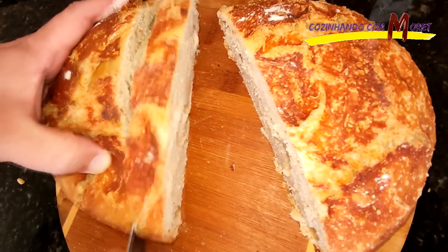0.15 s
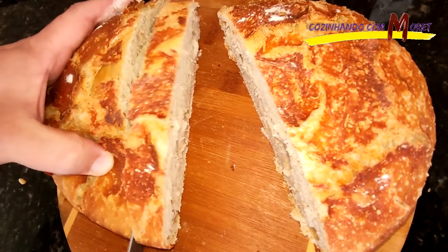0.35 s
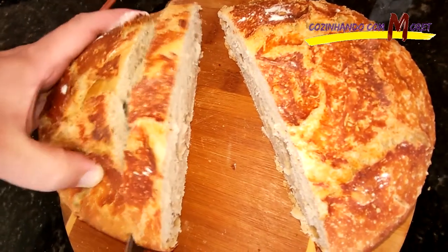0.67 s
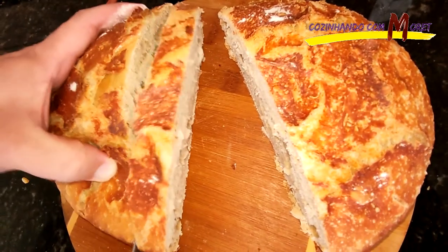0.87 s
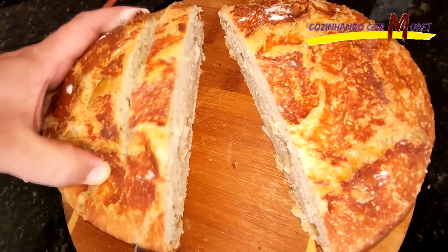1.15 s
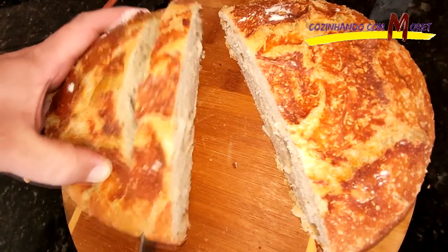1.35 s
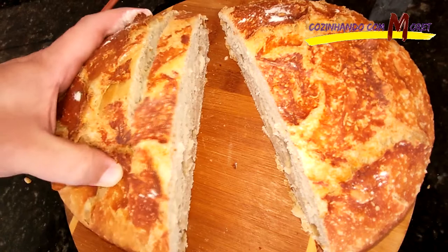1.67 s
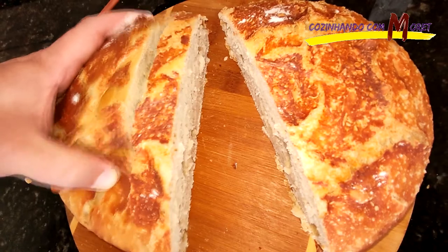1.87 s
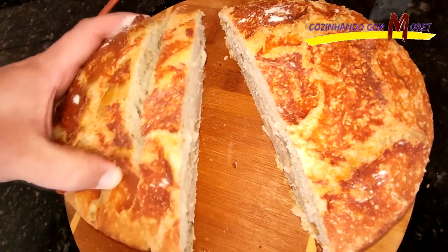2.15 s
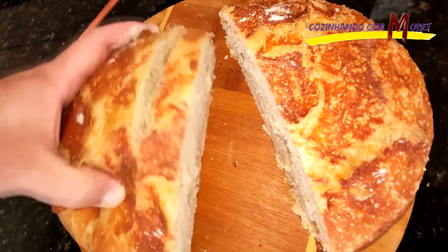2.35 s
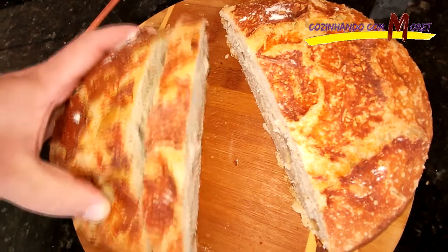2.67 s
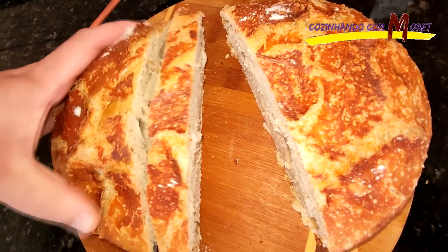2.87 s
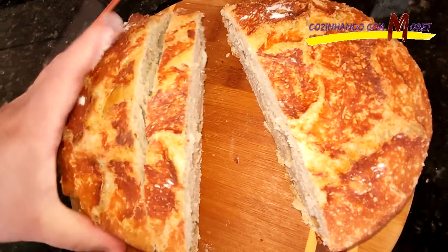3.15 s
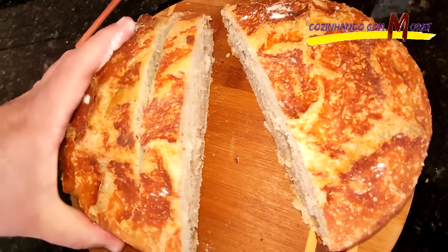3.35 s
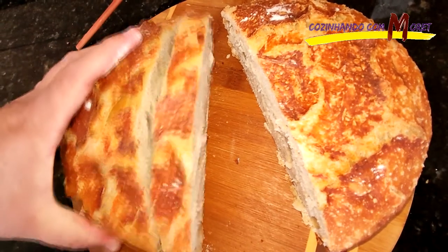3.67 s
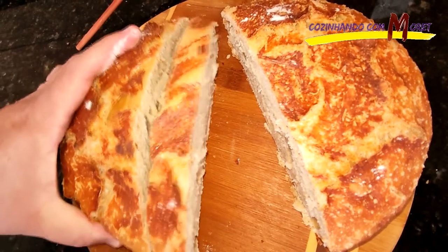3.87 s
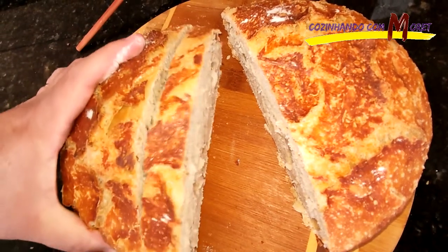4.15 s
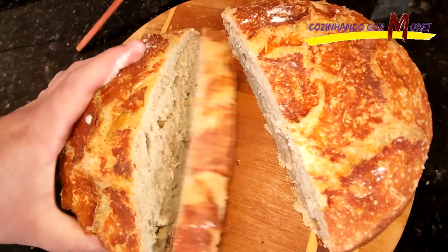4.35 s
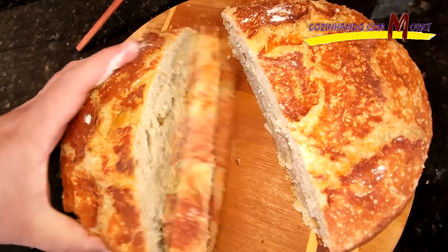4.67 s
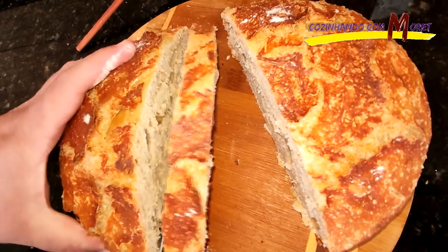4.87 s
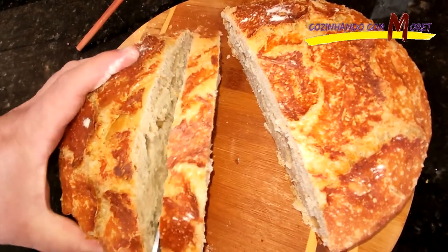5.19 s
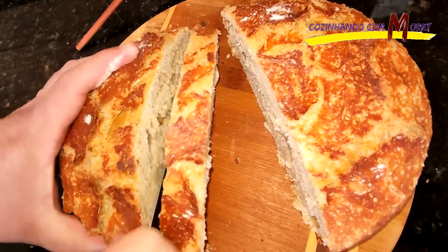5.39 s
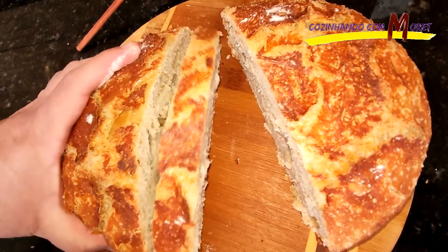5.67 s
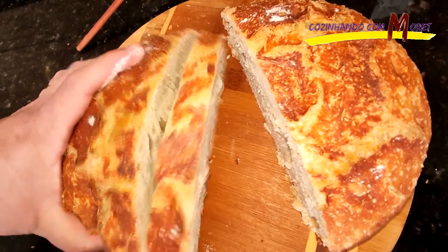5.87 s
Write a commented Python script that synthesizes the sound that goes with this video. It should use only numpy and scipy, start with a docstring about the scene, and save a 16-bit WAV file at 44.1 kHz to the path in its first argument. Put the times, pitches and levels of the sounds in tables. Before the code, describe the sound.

A knife saws through a crusty loaf on a wooden board, close up in a quiet kitchen with a faint low room rumble. From the start it moves back and forth about three times a second, each stroke a grainy rasp of crust over a softer drag through the crumb. Flakes snap off in crisp showers, thickest around 0.7 to 1 second and near 1.6 seconds. As the blade catches, the loaf gives hollow knocks and the board thrums, most clearly near 0.7 and 2 seconds. The sawing eases from about 2.5 seconds, then bites again with bright crackling at 3.2 seconds and a sharp snap near 3.9. From 4 to 5.4 seconds the strokes are shorter and much quieter, with scattered ticks of crust. Firmer strokes and crackles return from 5.5 seconds to the end at about 6 seconds.

```python
"""A knife saws through a crusty loaf on a wooden board, close up in a quiet kitchen.
The blade rasps the crust in fine grains, and flakes snap off in showers of crackle. Underneath,
it drags through the crumb, and its stick-slip jolts make the loaf shudder and the board thrum.
Two microphone ports, each with its own treble resonances, hear it, the left with a small lag."""
import sys
import numpy as np
from scipy import signal
from scipy.fft import rfft, irfft
from scipy.io import wavfile
from scipy.ndimage import uniform_filter1d

SR = 44100
rng = np.random.default_rng(int(sys.argv[2]) if len(sys.argv) > 2 else 0)


def dump(signal):
    """Clip the signal to [-1, 1] and save it as 16-bit WAV at the path in sys.argv[1]."""
    limited = np.clip(np.atleast_2d(signal).T, -1, 1)
    pcm = np.round(limited * 32767).astype(np.int16)
    wavfile.write(sys.argv[1], SR, pcm)


N = 265462
CONTROL_T = np.arange(0, N / SR + .002, .001)  # envelope clock in s, one step per millisecond


def undb(db):
    return 10 ** (np.asarray(db) / 20)


def unit(x):
    """Scale to rms 1."""
    return x / np.sqrt(np.mean(x ** 2))


def pan(db):
    """Left and right gains; positive dB leans left."""
    return undb(np.array([db, -db]) / 2)


def every_sample(envelope, late_s=0.):
    """Bring an envelope up to audio rate, with an optional delay."""
    return np.interp(np.arange(N) / SR - late_s, CONTROL_T, envelope)


def walk(rate):
    """Random modulator: glides to a new value rate times a second, rms 1."""
    hold = int(SR / rate)
    steps = np.repeat(rng.standard_normal(N // hold + 1), hold)
    return unit(uniform_filter1d(steps, hold)[:N])


def grains(rate, spread_db):
    """Random clicks, rate per second; a few stick far out."""
    hit = rng.random(N) < rate / SR
    return hit * rng.standard_normal(N) * undb(spread_db * rng.exponential(size=N))


def ring(x, modes):
    """A bank of two-pole resonators in alternating polarity."""
    return sum((-1) ** k * undb(db) * signal.lfilter(*signal.iirpeak(hz, hz / width, SR), x)
               for k, (hz, width, db) in enumerate(modes))


def glide(x, hz, width):
    """Swept resonator: shift its centre down to zero, smooth, shift back."""
    turn = np.exp(2j * np.pi * np.cumsum(hz) / SR)
    pole = np.exp(-np.pi * width / SR)
    return 2 * np.real(turn * signal.lfilter([1 - pole], [1, -pole], x / turn))


# Room tone spectrum: f/Hz, level/dB
ROOM_TONE = [(15, 7.5), (25, 9.5), (117, -1.5), (222, -20.5), (290, -12), (563, -17), (1160, -23.5),
             (3730, -40), (4380, -60), (7260, -43), (9220, -28), (12700, -36), (14500, -52)]
def kitchen():
    """A bed of rumble and hush, narrow in the bass and wide in the treble."""
    hz = np.arange(N // 2 + 1) * SR / N + 1
    point_hz, point_db = np.array(ROOM_TONE).T
    colour = undb(np.interp(np.log(hz), np.log(point_hz), point_db))
    mid, side = rfft(rng.standard_normal((2, N)), axis=1) * colour
    side *= np.clip(hz / 900, .18, 1)
    return undb(-47) * unit(irfft(np.array([mid + side, mid - side]), N, axis=1))


def nearby(x, t60_s, wet_db, near_s, near_db, left_lag_s=.0004):
    """One spot's sound: direct path, quick scatter off loaf and board (near), kitchen tail (wet)."""
    t = np.arange(SR // 3) / SR
    fade = undb(near_db - 60 * t / near_s) + undb(wet_db - 60 * t / t60_s)
    response = rng.standard_normal((2, len(t))) * fade
    response[0, int(left_lag_s * SR)] += 1
    response[1, 0] += 1
    response /= np.linalg.norm(response, axis=1, keepdims=True)
    return signal.fftconvolve(x, response, axes=1)[:, :N]


def along_cut(x, spots=4, hops_per_s=150, **room):
    """The contact hops between spots along the cut, each with its own echoes."""
    hold = SR // hops_per_s
    spot = np.repeat(rng.integers(0, spots, N // hold + 1), hold)[:N]
    return sum(nearby(x * (spot == k), **room) for k in range(spots))


# Treble peaks of each microphone port: f/Hz, width/Hz, level/dB
LEFT_PEAKS = [(5300, 500, -9.5), (8650, 2000, -7.5), (8400, 600, -18), (11280, 1460, 1), (12700, 860, -20)]
RIGHT_PEAKS = [(6580, 1600, -6), (7640, 1140, -3), (9180, 1530, 11.5), (9337, 2240, 8), (12660, 780, -6)]
def port_sheen(x):
    """Each port rings and puts its own sheen on the top end."""
    return np.array([ring(x[0], LEFT_PEAKS), ring(x[1], RIGHT_PEAKS)])


# Knife strokes: t/s, rise/s, hold/s, fall/s, rasp level/dB, drag level/dB, loaf level/dB, board level/dB
KNIFE_STROKES = [(0., 0.0016, 0.033, 0.074, -28, -18.5, -31, -61),
                 (0.138, .06, 0.25, 0.1, -33.5, -22, -21, -48),
                 (0.574, 0.011, .14, 0.12, -32, -22.5, -36, -51),
                 (0.818, 0.064, 0.094, 0.16, -26, -19, -18, -47),
                 (1.148, 0.066, 0.12, 0.13, -32.5, -22, -35, -52),
                 (1.459, 0.081, 0.049, 0.17, -27, -20.5, -20.5, -46),
                 (1.748, 0.06, 0.028, 0.084, -34, -20.5, -25, -43),
                 (1.913, .13, 0.035, 0.12, -27.5, -18.5, -13.5, -37),
                 (2.222, 0.12, 0.032, 0.09, -24.5, -16, -38, -56),
                 (2.493, 0.044, .22, 0.09, -37.5, -22.5, -21, -57),
                 (2.85, 0.11, 0.046, 0.12, -37.5, -32, -28.5, -58),
                 (3.189, 0.053, 0.083, 0.15, -31, -20.5, -21, -53),
                 (3.494, 0.09, 0.11, 0.055, -40, -27, -16.5, -43),
                 (3.771, 0.045, 0.053, 0.098, -26.5, -19.5, -17.5, -45.5),
                 (3.978, 0.1, 0.056, .06, -38.5, -28.5, -26.5, -55),
                 (4.2, 0.043, .01, 0.066, -43, -32.5, -28.5, -54),
                 (4.318, .05, 0.063, 0.083, -37, -35.5, -43, -74),
                 (4.619, 0.046, 0.044, 0.073, -40.5, -33.5, -29.5, -70),
                 (5.04, 0.1, 0.027, 0.062, -50, -34, -29, -66),
                 (5.179, 0.043, 0.061, 0.096, -37.5, -38, -53, -71),
                 (5.39, 0.066, .06, 0.036, -36.5, -38, -32.5, -64),
                 (5.498, 0.044, .09, .07, -33, -26, -26, -53),
                 (5.72, 0.077, 0.038, 0.062, -40.5, -28, -41, -49),
                 (5.862, 0.068, 0.036, 0.056, -31, -21.5, -17, -46)]
def blade_speeds():
    """One speed curve, 0..1, per stroke: the blade speeds up, holds, slows down."""
    corners = np.cumsum(np.array(KNIFE_STROKES)[:, :4], axis=1)
    ramps = np.array([np.interp(CONTROL_T, times, [0, 1, 1, 0]) for times in corners])
    return np.sin(np.pi / 2 * ramps)


def sawing(layer, law, rest_db, linger_db, linger_ms=120):
    """A layer's envelope: grows as speed ** law, smears a little, keeps a floor as the blade turns."""
    column = {"rasp": 4, "drag": 5, "loaf": 6, "board": 7}[layer]
    power = undb(2 * np.array(KNIFE_STROKES)[:, column]) @ blade_speeds() ** (2 * law)
    linger = np.abs(uniform_filter1d(power, size=linger_ms))
    return np.sqrt(power + undb(2 * linger_db) * linger + undb(2 * rest_db))


# Low-end accents: t/s, half-width/s, loaf level/dB, board delay/s, board level/dB, hollow level/dB
BITES = [(.01, 0.1, -12.5, 0.04, -50, -16.5), (0.413, 0.028, -43, 0.026, -38, -30),
         (0.672, 0.077, -4.5, 0.026, -38.5, -10), (0.964, 0.032, -19, 0.0046, -42.5, -16.5),
         (1.306, 0.086, -11, 0.022, -37, -16.5), (1.563, 0.042, -13, .005, -60, -26),
         (1.814, 0.071, -28, 0.0092, -45.5, -19), (2.042, 0.041, -7, 0.044, -40, -5),
         (2.338, 0.047, -8.5, 0.025, -46.5, -16.5), (3.002, 0.052, -47, 0.073, -46.5, -26.5),
         (3.351, 0.052, -27, .005, -39.5, -15), (3.595, 0.067, -40, 0.0039, -37.5, -25.5),
         (3.879, 0.02, -20, 0.0042, -39.5, -14), (5.612, 0.028, -16.5, 0.0055, -52, -41),
         (5.845, 0.045, -15.5, 0.032, -43.5, -23)]
def judders():
    """The blade bites and shoves the loaf: bell-shaped swells for loaf, board and hollow knock."""
    at, half_width, loaf_db, delay, board_db, hollow_db = np.array(BITES).T[:, :, None]

    def swell(centre, db):
        bells = undb(db) * np.exp(-((CONTROL_T - centre) / half_width) ** 2)
        return every_sample(np.linalg.norm(bells, axis=0))
    return swell(at, loaf_db), swell(at + delay, board_db), swell(at, hollow_db)


# The board's woody low end: f/Hz, width/Hz, level/dB
BOARD_MODES = [(91.3, 16, 3.5), (147.6, 24.2, 4.5), (188.5, 15.5, -1.5), (227.2, 19.7, -5.5)]
def board_thrum(swell):
    """The board answers each stroke a little late; its long waves reach both ports almost alike."""
    strokes = every_sample(sawing("board", law=1.43, rest_db=-56, linger_db=-15), late_s=.035)
    mid = unit(ring(grains(1500, 2.9), BOARD_MODES))
    side = unit(ring(rng.standard_normal(N), BOARD_MODES)) * undb(-16)
    return np.array([mid + side, mid - side]) * np.hypot(strokes, swell)


# The loaf's hollow notes: f/Hz, width/Hz, level/dB, pan/dB
HOLLOW_MODES = [(320, 19, -23, -26), (442, 24, -9.5, 1), (500.7, 31, -7.5, -8.5), (582.4, 32, -6, 0.5),
                (946, 46, -13.5, 3.5)]
def hollow_knock(jolts):
    """Jolts ring the loaf's deep modes, dry, each leaning its own way."""
    return sum((-1) ** k * ring(jolts, [(hz, width, db)]) * pan(pan_db)[:, None]
               for k, (hz, width, db, pan_db) in enumerate(HOLLOW_MODES))


# The loaf's midrange body: f/Hz, width/Hz, level/dB
LOAF_MODES = [(294.5, 68, -15), (641, 62, -14), (790, 175, -14), (1028, 97, -7), (1094, 340, -12.5)]
def loaf_shudder(body_swell, hollow_swell):
    """The blade sticks and slips, and the jolts shake the whole loaf."""
    slips = unit(grains(3000, .66) * undb(2.46 * walk(40)))
    push = every_sample(sawing("loaf", law=1.64, rest_db=-38, linger_db=-15))
    knock = hollow_knock(slips * np.hypot(push * undb(-5.5), hollow_swell))
    body = slips * np.hypot(push, body_swell) * pan(-1.3)[:, None]
    body = along_cut(body, t60_s=.28, wet_db=-30, near_s=.027, near_db=-25, left_lag_s=.00042)
    return ring(body, LOAF_MODES) + knock


# The crumb's steady colour: f/Hz, width/Hz, level/dB
CRUMB_MODES = [(2180, 1070, -14), (3540, 220, -25), (5400, 2200, -20)]
# Sweep of the slot's resonance: t/s, f/Hz
SLOT_SWEEP = [(0.0, 3930), (0.47, 3220), (0.5, 3920), (0.67, 3500), (1.09, 3720), (1.29, 3260),
              (1.68, 3740), (1.69, 3400), (2.2, 3500), (2.21, 3790), (2.48, 3260), (3.24, 3830),
              (3.64, 3270), (3.89, 3940), (4.29, 3470), (4.32, 4860), (4.46, 5100), (4.49, 3430),
              (4.59, 3530), (4.63, 4900), (4.68, 3370), (5.2, 3300), (5.28, 4060), (6.02, 3520)]
def crumb_drag(catch):
    """The blade drags through the crumb; a resonance moves as the slot opens and closes."""
    strokes = every_sample(sawing("drag", law=1.24, rest_db=-40, linger_db=-10.5))
    drag = unit(grains(5000, 1.56) * undb(2.2 * catch)) * strokes
    drag = along_cut(drag[None], t60_s=.12, wet_db=-20, near_s=.0034, near_db=-17)
    slot_hz = np.interp(np.arange(N) / SR, *np.array(SLOT_SWEEP).T)
    slot_hz *= np.exp(.057 * walk(25))
    return ring(drag, CRUMB_MODES) - undb(-11) * glide(drag, slot_hz, width=630)


def small_snaps(rasp_envelope, count=18, over_db=10.5):
    """Random filler snaps that ride above the rasp, more often where the blade is fast."""
    speed = blade_speeds().sum(axis=0)
    at = np.interp(rng.random(count), np.cumsum(speed) / np.sum(speed), CONTROL_T)
    size, bright, side = rng.standard_normal((3, count))
    db = 20 * np.log10(np.interp(at, CONTROL_T, rasp_envelope)) + over_db + 3 * size
    thick_db = np.full(count, 13.5)
    return list(zip(np.minimum(at, (N - 1) / SR), db, thick_db, .34 * bright, 13 + 3.8 * side))


def flake_break(crumble_s=.0008, again_s=.0013, thick_s=.00097):
    """A tick crumbles away and gives again a moment later; the thick version adds a puff of noise."""
    t = np.arange(1024) / SR
    noise = .17 * rng.standard_normal((2, len(t)))
    since_second = t - again_s * (.5 + rng.random())
    second_break = (since_second >= 0) * np.exp(-np.abs(since_second) / crumble_s)
    tick = noise * (np.exp(-t / crumble_s) + second_break)
    tick[:, 0] = 1
    tick *= 1.85 / np.linalg.norm(tick, axis=1, keepdims=True)
    puff = noise * (t / thick_s) * np.exp(1 - t / thick_s)
    return tick, .72 * tick + puff


# The crunch of thick flakes: f/Hz, width/Hz, level/dB
FLAKE_MODES = [(2100, 930, -17), (3700, 860, -11.5), (5530, 2000, -17.5)]
# Featured snaps: t/s, level/dB, thick-flake send/dB, brightness/(-1..1), pan/dB, shower level/dB
CRUST_SNAPS = [(.1786, -23, 16, .1, -5, -52), (0.214, -7, -1, -0.51, -3, -44),
               (0.234, -9, 5, -0.0017, 5, -28), (0.246, -21, 17, .26, 6, -41),
               (0.263, -2, 2, -0.43, 2, -37), (0.3772, -8, 7.5, 0.63, -3, -53),
               (.4274, -28.5, -2.5, .19, -6.5, -57.5), (0.484, -21.5, -16, -0.42, -18.5, -33),
               (0.583, -14, 12.5, .1, -19, -39), (.587, -10, 9.5, -0.087, 1, -27),
               (0.612, -1, -13, -0.015, -8, -38), (0.639, -5, 5, -0.62, -3, -22),
               (0.664, 3.5, -3, -0.017, -2, -33), (0.668, 1, 2.5, 0.25, -5, -26),
               (0.7274, 6.5, 5, -0.54, 9, -28), (0.7315, 8.5, -18, -0.69, 7, -24),
               (0.7322, 6, -14, -0.73, -10, -27), (.806, -12, -6, -0.32, -6, -56),
               (0.862, -15, 15, -0.25, -10, -36), (0.873, -28, 26, -.3, 17, -37),
               (0.897, 3.5, -20, -0.79, -10, -33), (.9107, 4, -12, -0.56, 4, -19),
               (0.9282, 9.5, -8.5, -0.66, -3, -15), (0.935, 4.5, 4, -0.98, 14, -25),
               (0.951, -13, -7, .46, 2, -29), (0.9669, 3, 3, -0.68, -3, -39), (0.997, -9, 7, -.3, -5, -44),
               (1.0102, 3, -12, -0.11, 1, -41), (1.023, 3, -12, -0.031, 3, -44),
               (1.09, -14, -5, -0.22, -10, -25), (1.0975, -3, -6, -0.11, -4, -42),
               (1.1002, -3.5, -4, 0.5, 0, -44), (1.225, -8, 5, 0.51, -14.5, -22.5),
               (1.409, -12.5, 10, 0.33, -15, -35), (1.445, -16, -9, 0.54, -3, -58),
               (1.478, -24.5, 21, .3, 1, -43), (1.5, -15, 8, 0., -4, -47), (1.539, 0, 2, 0.61, 1, -34),
               (1.5436, -1, -5, 0.52, -6, -20), (1.548, 3.5, 2, .62, 0, -17), (1.5612, 11.5, -4, 1, 0, -25),
               (1.562, -4, -4, 0.88, 2, -35), (1.573, -2, -4, 0.69, 6, -35), (1.6146, -9, -10, .5, -1, -42),
               (1.6272, -8, -11, .4, 10, -40), (1.649, -3, -9, -0.1, 7, -45),
               (1.6503, 3, 0.5, 0.14, -7, -38), (1.6702, 2.5, -17, 0.99, 4, -39),
               (1.673, -8, -16, 0.89, -20, -37), (1.7092, -3, 2, -0.47, 1, -29),
               (1.808, -5.5, -1, 0.75, -12, -27), (1.9335, -15, 11.5, 0.021, 4, -30),
               (2.2279, -38, 2, .1, -3, -63), (2.2524, -10, 10.5, 0.45, 1, -51),
               (2.2933, -9, 2.5, -.1, -4.5, -23), (2.349, 0, 8.5, 0.25, -3, -43),
               (2.411, -14, 1, .17, 0, -44), (2.516, -21.5, 21.5, -.2, -8, -30),
               (2.658, -23, -2, -0.002, -13.5, -53), (2.748, -18.5, 14, -0.68, -13, -42),
               (2.8, -2.5, -6, 0.9, -5, -37.5), (2.81, -16, -4.5, .8, 7, -58.5),
               (2.882, -20.5, 10, 0.97, -14, -59), (2.937, -18, 5, .29, -1, -34),
               (3.1174, -22.5, 15, -.1, -5, -39), (3.18, -16, 4, .7, -1, -37),
               (3.1858, 2, -4.5, 0.98, -3, -32.5), (3.228, -16, 7, .6, 15, -29), (3.235, 1, 4, 1, -5, -22),
               (3.236, -2, -7, 0.68, 0, -30), (3.241, -4.5, 14.5, 0.35, 5, -21.5),
               (3.2506, -2, -9, .4, -2, -30), (3.2585, -4, -5, .4, -5, -34),
               (3.273, -3, -11, 0.58, -2, -45), (3.326, -5, 8, 0.18, -18, -30),
               (3.3303, -4, -10, 0.27, -1, -22), (3.3592, -9.5, 10, 0.44, 0, -25),
               (3.46, -24, 1, -.2, -20, -42), (3.54, -17, 3, -0.7, -1, -58),
               (3.664, -16.5, 13, 0.34, -10, -30), (3.701, -9.5, 6, 0.53, -3, -31),
               (3.7155, -13.5, 12.5, -0.2, -10, -44), (3.7997, -12, -1, .2, -2, -34),
               (3.801, -2.5, -7, 0.31, -11, -35), (3.813, 5.5, -2, 0.52, -5.5, -19.5),
               (3.8538, -12, 8, 0.13, -8, -43), (3.8695, -3, -15, 0.54, -9, -41),
               (3.883, 12.5, 0.5, 0.72, 4, -20.5), (4.037, -23, 19.5, -.4, 9, -60),
               (4.092, -12, 11, 0.48, -12, -48), (4.1404, -13.5, 7, 0.3, -5, -36),
               (4.2346, -12, -1, 0.5, 4, -37), (4.25, -14, 2, 0.2, 3, -50),
               (4.337, -25.5, 18, -.3, -4, -53), (4.3483, -9, 4.5, -0.11, 7, -30),
               (4.3603, 4.5, -5, -1, 0, -39), (4.374, -10, -1, -.6, 2, -42), (4.426, -8, -7, -0.58, 2, -45),
               (4.43, -17.5, 12, -0.099, -4, -41), (4.4416, -7, -21, -1, -2, -41),
               (4.489, -35.5, 30.5, 0., -7, -53), (4.5306, -3, -7, .89, 5.5, -35.5),
               (4.539, -21, -6, .8, 0, -40), (4.631, -27.5, 16, -.8, 6, -60),
               (4.6555, -27, 15.5, 0.018, -5, -54), (4.708, -19, -6, 0.49, -17, -45),
               (4.84, -10.5, -7, -0.74, -5, -38.5), (4.919, -32, -4, -.2, -8, -67),
               (5.082, -32, 10, -0.12, -12, -60), (5.149, -20, 10.5, -0.0068, -12, -40),
               (5.309, -14, -16, 0.73, -8, -56), (5.3235, -28, -11, .6, 0, -58),
               (5.367, -9.5, -19, 1, -1, -53), (5.486, -6, -6, 1, -11, -35), (5.4955, -12, 0, .6, 0, -28),
               (5.5445, -3, 6, 0.0092, -14, -18.5), (5.572, -17, -13, 0.34, -2, -25),
               (5.5831, -8, -15, 0.61, -15, -42), (5.728, -27, 19, -.1, -3, -34),
               (5.755, -18, 8, -0.12, -10, -33.5), (5.783, -9, -4, 0.23, -5, -52),
               (5.796, -15, 7, .1, -1, -50), (5.9096, -15, 4, 0.0093, -11, -46),
               (5.938, -12, 17.5, 0.0017, -3, -40), (5.96, -13, 13, .1, -8, -50)]
def crust_snaps(rasp_envelope):
    """Flakes break on top of the crust with little scatter: a thin tick over a lower, thick crunch."""
    thin, thick = np.zeros((2, 2, N + 1024))
    for at, db, thick_db, bright, pan_db, *_ in CRUST_SNAPS + small_snaps(rasp_envelope):
        tick, crunch = flake_break()
        tilted = signal.lfilter([1, -bright], [np.hypot(1, bright)], tick)
        i = int(at * SR)
        thin[:, i:i + 1024] += undb(db) * tilted * pan(pan_db)[:, None]
        thick[:, i:i + 1024] += undb(db + thick_db) * crunch
    thin = nearby(thin[:, :N], t60_s=.16, wet_db=-35, near_s=.005, near_db=-22)
    thick = nearby(thick[:, :N], t60_s=.12, wet_db=-25.5, near_s=.0061, near_db=-36)
    return port_sheen(thin) + ring(thick, FLAKE_MODES)


def showers(t60_s=.23):
    """Coarse crumbs keep crackling, ever fainter, after each featured snap."""
    kicks = np.zeros(N)
    for at, *_, shower_db in CRUST_SNAPS:
        kicks[int(at * SR)] += undb(2 * shower_db)
    power = signal.lfilter([1], [1, -undb(-120 / t60_s / SR)], kicks)
    return unit(grains(1500, 3.33) * undb(.84 * walk(130))) * np.sqrt(power)


def crust_rasp(envelope, catch):
    """The edge rasps the crust in fine grains; rasp and showers drift between left and right."""
    rasp = unit(grains(5000, 1.14) * undb(.53 * catch)) * every_sample(envelope)
    grit = (rasp + showers()) * pan(-1.5 + 3 * walk(5.3))
    return port_sheen(along_cut(grit, t60_s=.18, wet_db=-33, near_s=.008, near_db=-16))


def scene():
    """The mix from the bed up: kitchen, board and loaf, crumb, crust."""
    loaf_swell, board_swell, hollow_swell = judders()
    catch = walk(70)  # the edge catches and lets go, in crust and crumb together
    rasp_envelope = sawing("rasp", law=1.8, rest_db=-58, linger_db=-8)
    body = board_thrum(board_swell) + loaf_shudder(loaf_swell, hollow_swell)
    crust = crust_snaps(rasp_envelope) + crust_rasp(rasp_envelope, catch)
    return kitchen() + body + crumb_drag(catch) + crust


def record(dry, port_hz=14200, top_hz=15600, ceiling=.9):
    """Output chain: the ports' steep roll-off, a soft clip on the loudest peaks, a final high cut."""
    ports = signal.sosfilt(signal.ellip(6, .5, 34, port_hz, fs=SR, output="sos"), dry)
    rounded = ports / (1 + np.abs(ports / ceiling) ** 4) ** .25
    return signal.sosfilt(signal.ellip(10, .2, 80, top_hz, fs=SR, output="sos"), rounded)


dry = scene()
out = record(dry)
dump(out)
```